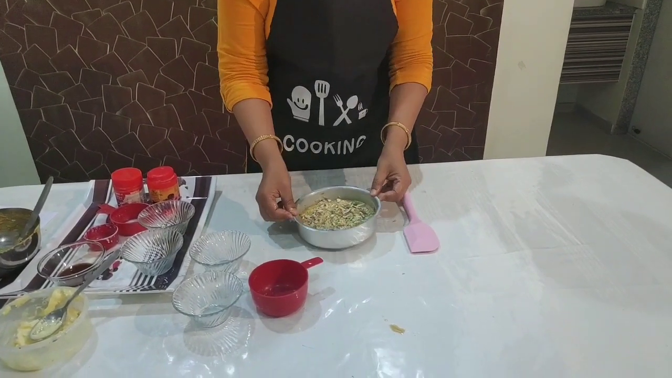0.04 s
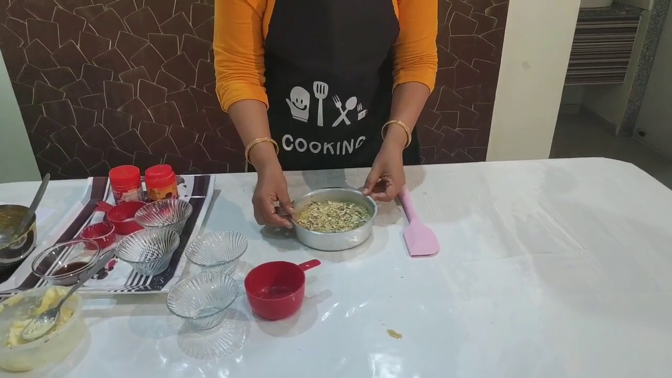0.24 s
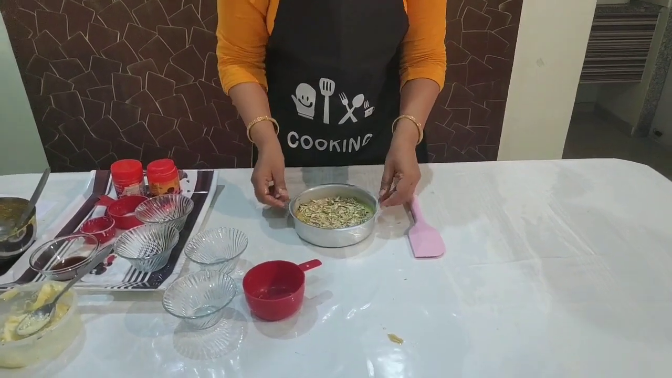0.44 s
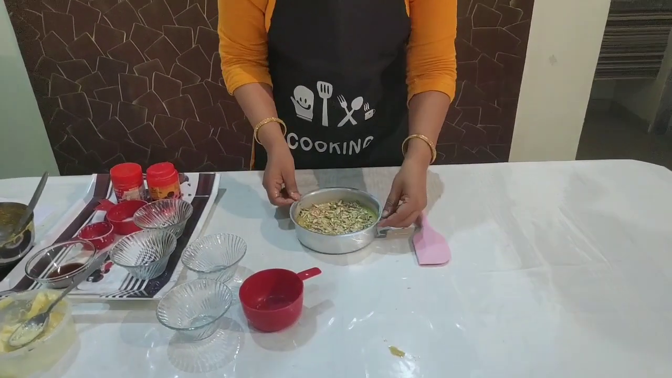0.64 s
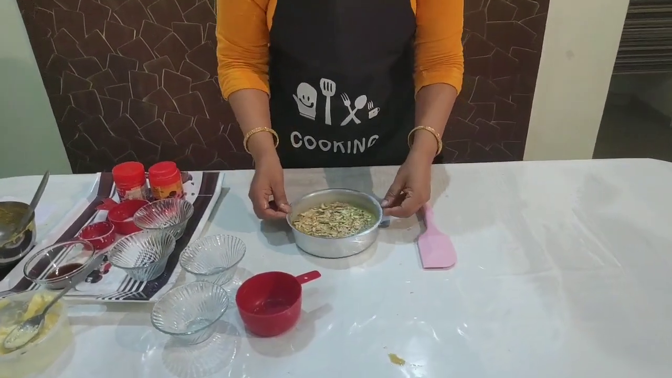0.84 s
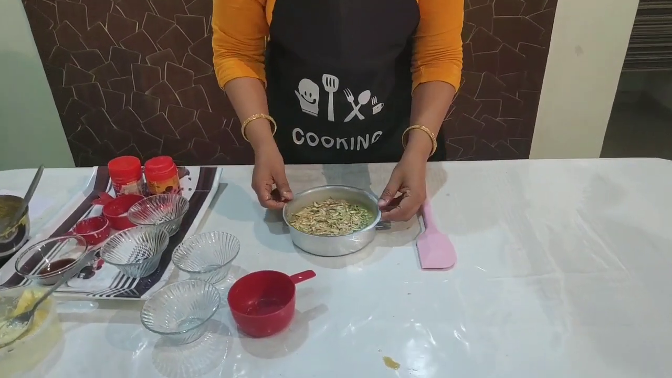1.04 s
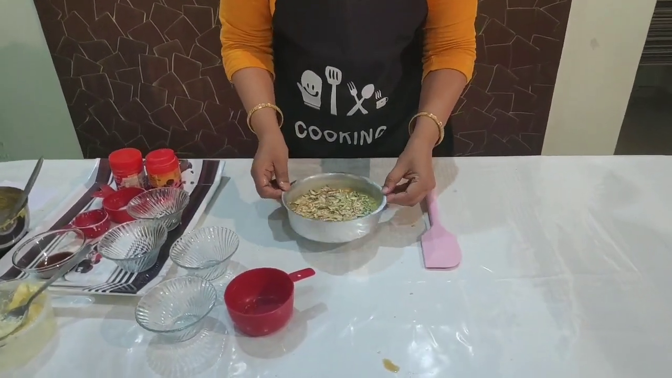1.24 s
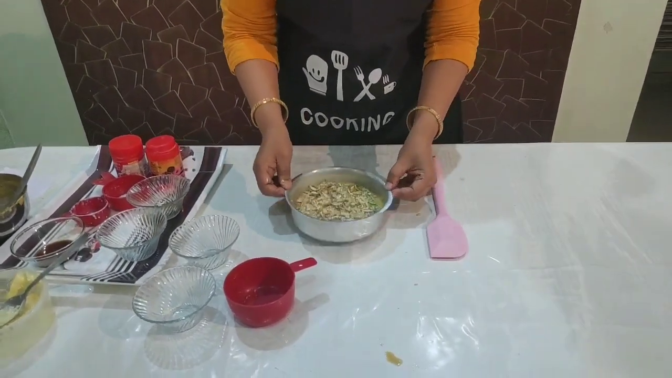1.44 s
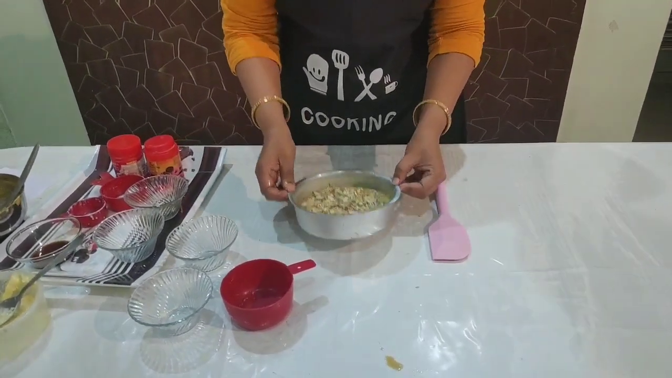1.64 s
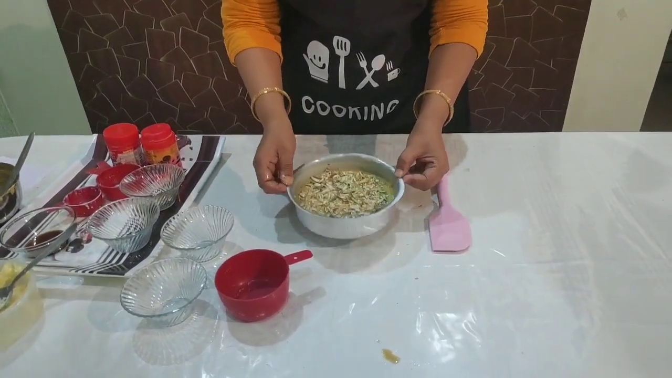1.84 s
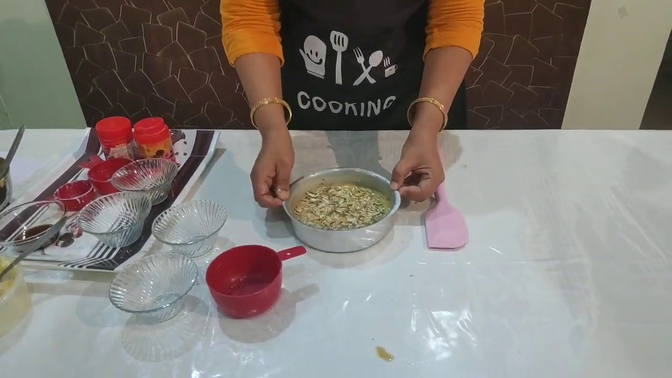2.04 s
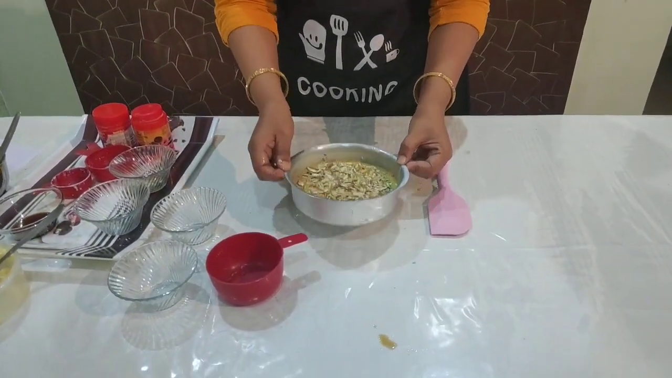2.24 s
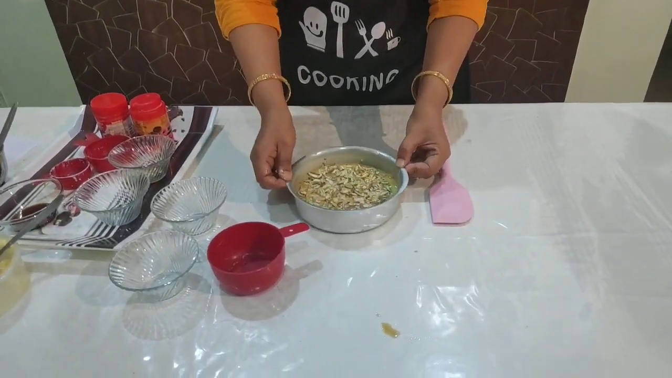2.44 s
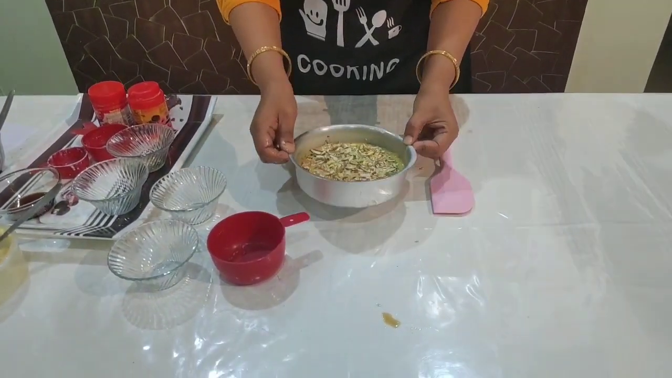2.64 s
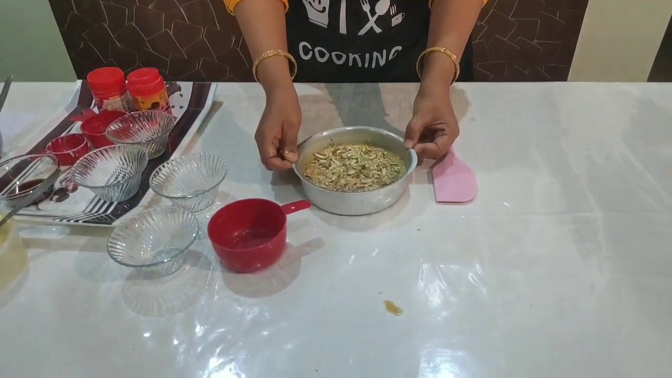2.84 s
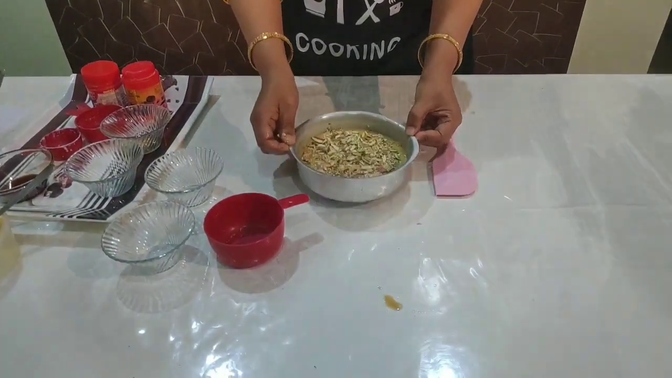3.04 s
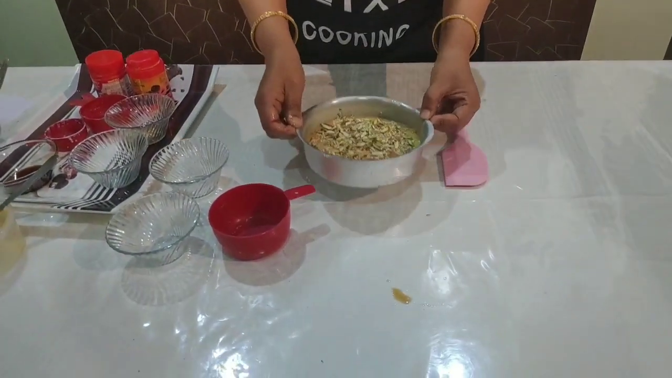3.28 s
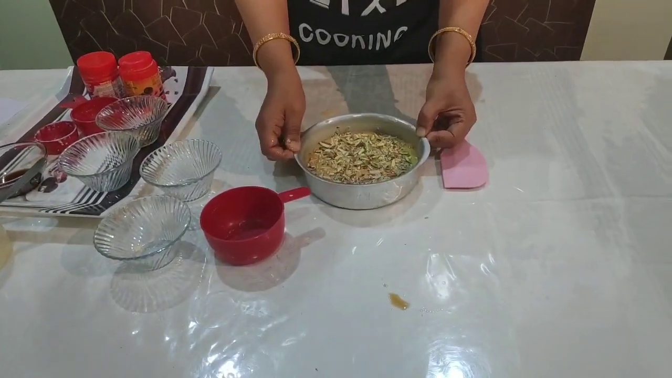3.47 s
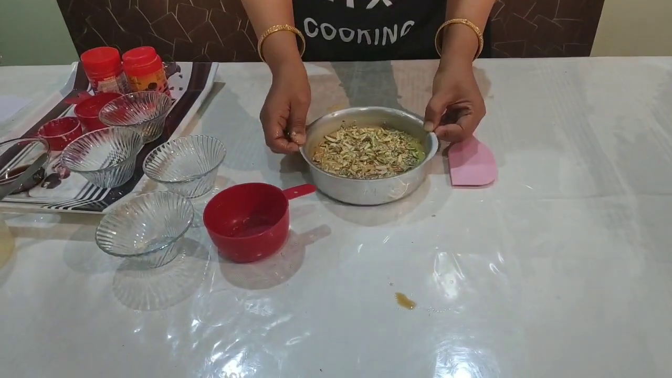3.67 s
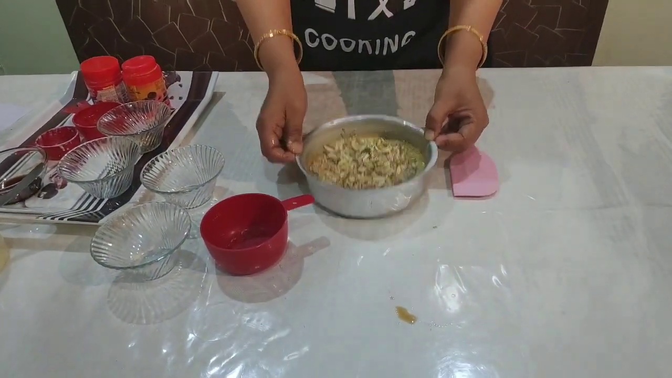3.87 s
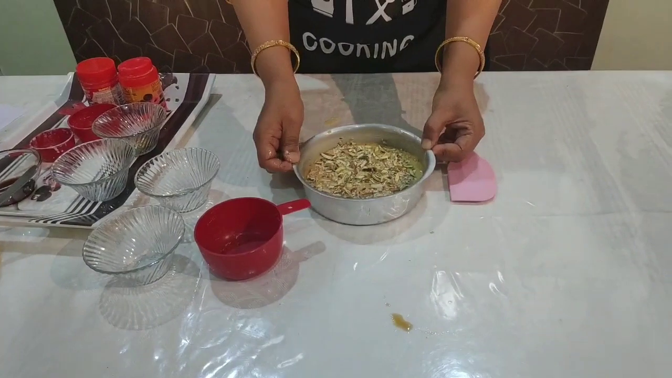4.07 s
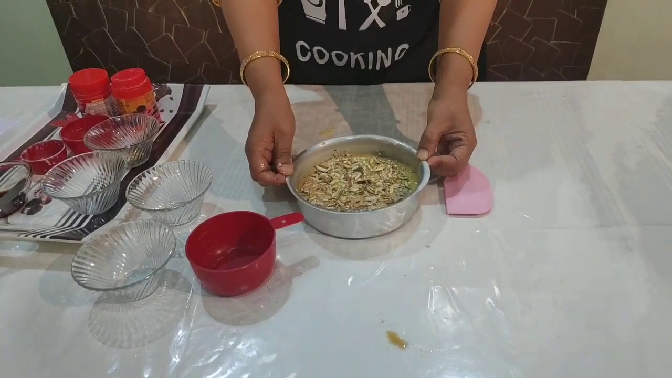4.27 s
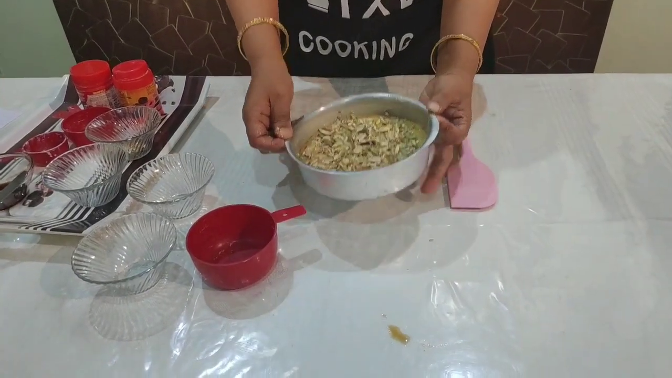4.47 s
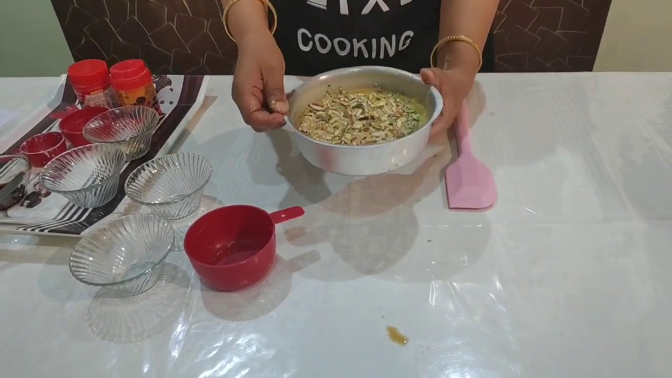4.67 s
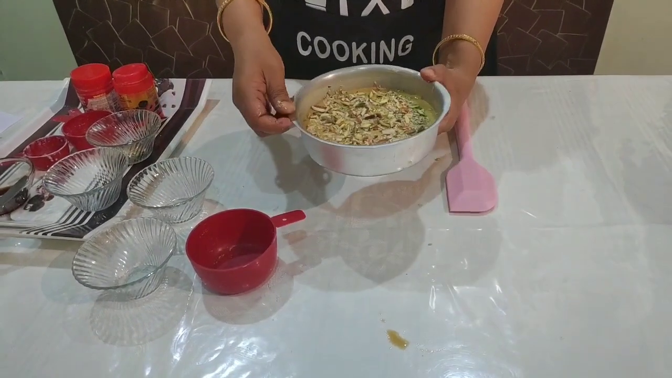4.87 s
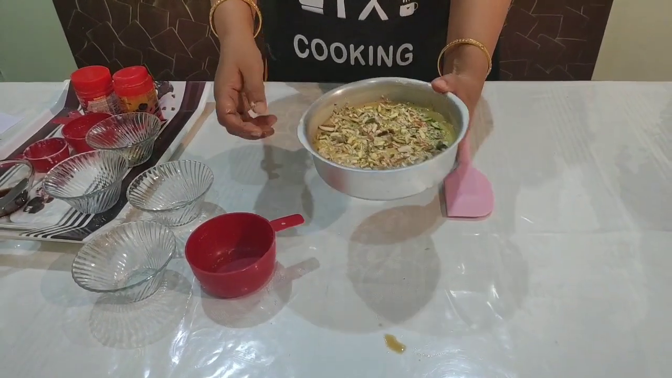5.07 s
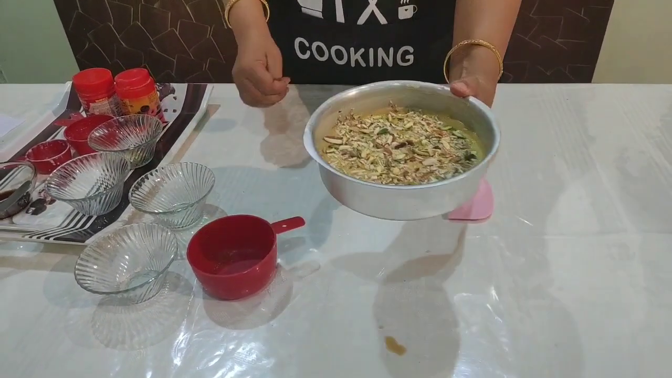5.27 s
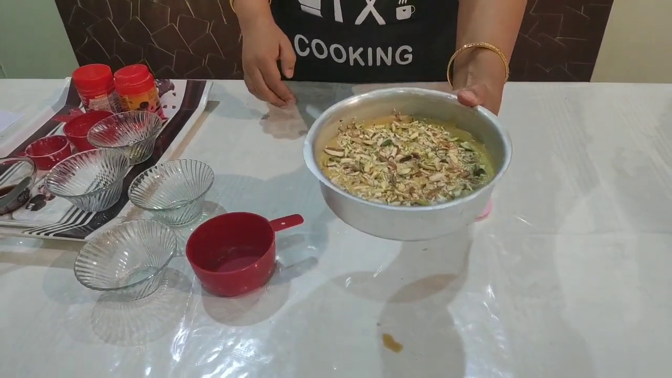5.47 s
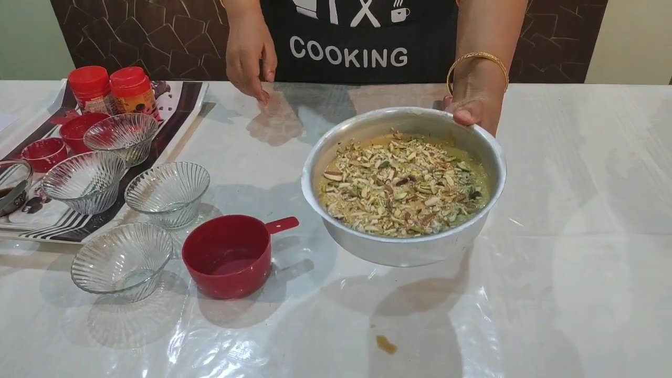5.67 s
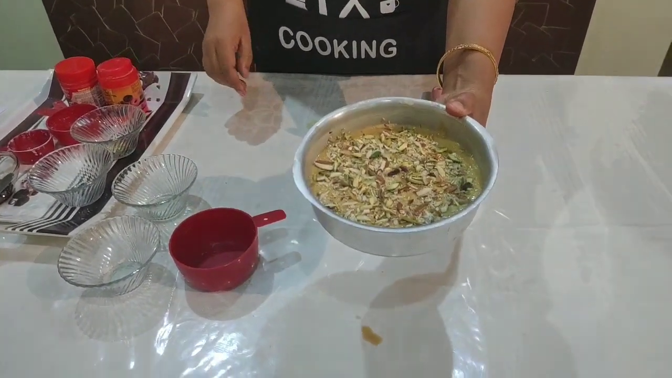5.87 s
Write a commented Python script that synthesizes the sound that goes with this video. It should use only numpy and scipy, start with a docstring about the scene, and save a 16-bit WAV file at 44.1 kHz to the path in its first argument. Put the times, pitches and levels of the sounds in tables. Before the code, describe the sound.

A hard-surfaced kitchen with quiet low room noise, a faint wavering hum near 150 Hz and lumpy handling rumble, strongest at the start. From 0.2 to 1.2 s sleeves swish softly with a few tiny ticks. A round metal tin full of batter then knocks on a table at about 1.4, 1.74, 2.08, 2.41, 2.82, 3.39 and 3.98 s. In the first six the rim strikes first with a very short, damped, mid-pitched clank, often followed within milliseconds by a lower base thud and a puff of squeezed air. The fifth and sixth are heaviest, near overload; the seventh is a dull, flat slap with little ring. Each leaves a low boom around 300 Hz and a bright room tail of roughly half a second. Small ticks follow at 4.35 to 4.6 s, then a clearer cloth swish around 5.3 s, and quiet room noise until 6 s. Stereo microphones, fairly close.

```python
"""A round tin full of batter is knocked seven times on a table in a hard-walled kitchen.
In the first six knocks the rim lands first with a short damped ring (fading sine waves struck by a
brief force); the seventh is a flat slap. Slaps squeeze out air (a puff of shaped noise and a slow push).
Table and room boom on (slowly dying low tones and noise tails), over room noise, a deep handling rumble,
a faint hum, small ticks (short snaps) and the swish of sleeves (noise that swells and fades)."""
import sys
import numpy as np
from scipy import signal
from scipy.fft import rfft
from scipy.io import wavfile
from scipy.ndimage import uniform_filter1d

SR = 44100
rng = np.random.default_rng(int(sys.argv[2]) if len(sys.argv) > 2 else 0)


def write(x):
    x = np.atleast_2d(x).T
    wavfile.write(sys.argv[1], SR, np.round(np.clip(x, -1, 1) * 32767).astype(np.int16))


N = 260631  # length of the scene in samples


def gain_of(db):
    """Turn decibels into a factor for the wave."""
    return 10 ** (np.asarray(db) / 20)


def evened(x):
    """Scale a sound to an average (rms) strength of 1."""
    return x / np.sqrt(np.mean(x ** 2) + 1e-20)


def read(points, hz):
    """Read a curve between its points, on a pitch-like (logarithmic) frequency scale."""
    f, value = np.transpose(points)
    return np.interp(np.log(hz + 1), np.log(f + 1), value)


def add(mix, s, sound):
    """Lay a sound into the mix, starting at s seconds."""
    part = mix[..., round(s * SR):][..., :sound.shape[-1]]
    part += sound[..., :part.shape[-1]]


def causal(db):
    """Make a filter that reacts as early as it can (minimum phase) from gains in dB on 1025 bins."""
    log_gain = np.log(gain_of(np.maximum(db, -100)))
    full = np.concatenate([log_gain, log_gain[-2:0:-1]])
    spectrum = np.exp(np.conj(signal.hilbert(full)))
    return np.fft.ifft(spectrum).real[:1024]


# How alike left and right are in sound that comes from all around.
# Each row: frequency in Hz, likeness from -1 (opposite) to 1 (identical).
LIKENESS = [(60, 0.81), (130, 1), (290, 0.86), (640, 0.59), (1410, -0.11), (3100, -0.037), (6820, 0.071),
            (15000, 0.62)]


def pair(shape):
    """Two channels of noise from all around; shape(hz, s) gives its level in dB at each pitch and time."""
    frames, hz = N // 256 + 5, np.fft.rfftfreq(1024, 1 / SR)
    a, b, c, d = rng.standard_normal((frames, 513, 4)).T
    same = np.clip(read(LIKENESS, hz), -1, 1)[:, None]
    left = a + 1j * b
    right = same * left + np.sqrt(1 - same ** 2) * (c + 1j * d)
    level = gain_of(shape(hz[:, None], np.arange(frames) * 256 / SR))
    return signal.istft(np.array([left, right]) * level, nperseg=1024, noverlap=768)[1][:, :N]


# Colour of the room noise. Each row: frequency in Hz, relative level in dB per Hz.
AIR_COLOUR = [(40, -7), (65, -32), (92, -30), (125, 2), (160, -2), (200, 1.5), (300, -3), (452, -5),
              (520, -8.5), (958, -10.5), (1330, -15.5), (3830, -23), (6720, -24.5), (11800, -35),
              (16400, -44)]
# How the deep handling rumble rises and falls. Each row: time in seconds, level in dB.
RUMBLE_LEVEL = [(0, -63), (0.08, -40.5), (0.3, -45), (0.42, -48), (1.2, -53.5), (1.35, -44), (1.6, -51),
                (4.4, -51), (5.3, -59), (5.9, -54)]
AIR_DB = -44
HUM_HZ, HUM_WIDTH_HZ, HUM_DB = 151, 5.9, -50.5


def air():
    """Steady noise fills the room, with a wavering hum and a lumpy deep handling rumble."""
    bed = pair(lambda hz, s: read(AIR_COLOUR, hz) + 0 * s)

    # slow random drift makes the hum waver; a wider hum drifts faster
    r = np.exp(-np.pi * HUM_WIDTH_HZ / SR)
    drift = evened(signal.lfilter([1 - r], [1, -r], rng.standard_normal((2, N))))
    waver = 5.1 + drift.T @ [1, 1j]
    hum = (waver * np.exp(2j * np.pi * HUM_HZ * np.arange(N) / SR)).real

    rumble = evened(pair(lambda hz, s: -12 * (hz / 55) ** 2 + 0 * s))
    level = gain_of(np.interp(np.arange(N) / SR, *np.transpose(RUMBLE_LEVEL)))
    # each side also gets a fainter time-reversed copy of itself, flipped on the right
    reversed_copy = 0.28 * rumble[:, ::-1] * [[1], [-1]]
    return gain_of(AIR_DB) * evened(bed) + gain_of(HUM_DB) * evened(hum) + level * (rumble + reversed_copy)


# Colour of the cloth hiss. Each row: frequency in Hz, relative level in dB per Hz.
CLOTH_COLOUR = [(1470, -5), (2500, -2), (3240, -2.5), (7010, 5.5), (12400, 2), (15600, -7), (16000, -9),
                (16400, -17)]
# Sleeves brush as the arms move. Each row: middle in seconds, length in seconds, peak level in dB.
SLEEVE_SWISHES = [(0.214, .12, -62), (0.41, 0.47, -54.5), (0.61, 0.36, -55), (0.908, 0.51, -57.5),
                  (1.12, .2, -62), (1.337, .08, -66), (1.687, 0.17, -54.5), (4.344, 0.3, -63.5),
                  (4.685, 1, -62), (5.324, 1, -48.5), (5.58, .2, -62)]
SWISH_POINTED = 3.9  # power of each arch: higher is more pointed
CLOTH_REST_DB = -66.5  # faint rustle under and between the swishes


def rustle():
    """Rubbing cloth makes a slightly grainy hiss that swells and fades with each movement of the arms."""
    grain = gain_of(0.83 * evened(uniform_filter1d(rng.standard_normal(N), 300)))
    t = np.arange(N) / SR
    level = gain_of(CLOTH_REST_DB)
    for middle, length, db in SLEEVE_SWISHES:
        arch = abs(np.cos(np.pi * np.clip((t - middle) / length, -.5, .5)))
        level = level + gain_of(db) * arch ** SWISH_POINTED
    hiss = pair(lambda hz, s: read(CLOTH_COLOUR, hz) + 0 * s)
    return level * evened(grain * hiss)


# Small ticks of fingers and bangles. Each row: start in seconds, relative level in dB, pitch in Hz.
SMALL_TICKS = [(0.181, -39.5, 3610), (0.2894, -45, 6860), (1.0807, -49, 2690), (4.353, -42.5, 3480),
               (4.4608, -42.5, 3160), (4.588, -49, 7560), (5.084, -51, 2640)]


def ticks():
    """Each tick is a brief broad snap around its pitch: a tone roughened by noise, dying quickly."""
    out, t = np.zeros((2, N)), np.arange(400) / SR
    noises = rng.standard_normal((len(SMALL_TICKS), 2, 400))
    for (s, db, hz), noise in zip(SMALL_TICKS, noises):
        snap = np.sin(2 * np.pi * hz * t) * uniform_filter1d(noise, 8) * 2 + 0.17 * noise
        add(out, s, gain_of(db - 60 * t / 0.097) * snap)  # would fall 60 dB in 0.097 s
    return out


# Air squeezed from under the tin. Each row: start in seconds, puff level in dB (rms before it is shaped
# in time), puff length in ms, relative push level in dB, length of one push cycle in ms,
# mid-treble boost of the puff in dB.
AIR_SLAPS = [(1.394, -34, 6.2, -29, 7.6, 2), (1.4225, -23, 6.4, -19, 10.5, -4),
             (1.74, -20.5, 1.5, -41, 4.4, -4), (1.7472, -16, 5.5, -12, 8.8, 6),
             (2.0795, -21.5, 3.9, -20, 11.4, 14), (2.0879, -26.5, 7.1, -16, 8.5, -7),
             (2.4041, -29.5, 2.42, -18.5, 9.7, 1), (2.4097, -22.5, 6, -12.5, 9.2, -4.5),
             (2.8161, -15.5, 7.2, -13.5, 9.9, 0), (3.393, -14.5, 9.1, -12.5, 9.9, -0.5),
             (3.9842, -20, 7.8, -10.5, 9.6, 1.5)]
# Colour of the puff. Each row: frequency in Hz, relative level in dB per Hz.
PUFF_COLOUR = [(900, -21), (1700, -3.5), (2750, -8), (3350, -4.5), (3600, -4), (4000, -8), (4700, -7.5),
               (5500, -9), (6600, -1.5), (8140, -8), (11400, -10), (15300, -19.5), (16400, -35)]
LEAD_MS = 3  # a faint hiss leads in before each puff


def slaps():
    """The closing gap hisses out a puff, also sent to the walls, and pumps air in a slow fading cycle."""
    puffs, spread, pushes = np.zeros((2, N)), np.zeros(N), np.zeros(N)
    hz = np.fft.rfftfreq(2048, 1 / SR)
    noises = rng.standard_normal((len(AIR_SLAPS), 3, 1000))
    for (s, db, ms, push_db, push_ms, tilt_db), noise in zip(AIR_SLAPS, noises):
        boost = tilt_db * np.exp(-np.log(hz / 3500 + 1e-3) ** 2)
        colour = causal(read(PUFF_COLOUR, hz) + boost)
        shared_and_own = 1.04 * noise[0] + 0.48 * noise[1:]  # partly alike on left and right
        hiss = signal.oaconvolve(shared_and_own, colour[None])[:, :1000]

        u = (np.arange(1000) / SR * 1000 - LEAD_MS) / max(ms, 1)  # 0 to 1 during the puff
        swell = np.sin(np.pi * np.clip(u, 0, 1) ** 0.81) ** 1.76
        lead_in = 0.079 * (u < .5) * np.exp(5.3 * np.minimum(u, 0))
        puff = gain_of(db) * evened(hiss) * (swell + lead_in)
        add(puffs, s - LEAD_MS / 1000, puff)

        # the walls get the puff's energy as one coloured click at its middle
        add(spread, s + ms / 2000, colour * np.linalg.norm(puff[0]) / np.linalg.norm(colour))

        v = np.arange(1500) / SR * 1000 / max(push_ms, 2)  # counts push cycles
        push = np.sin(2 * np.pi * v) * v * np.exp(1 - 2.23 * v) * 2
        add(pushes, s, -gain_of(push_db) * push)
    return puffs, spread, pushes


# Tones (modes) of the tin, damped by batter, before each blow's pitch factor.
# Each row: frequency in Hz, relative level in dB, time to fall 60 dB in seconds.
TIN_MODES = [(432, -26.5, 0.11), (661, -1, 0.031), (800, 2, 0.015), (909, -0.5, 0.016), (1136, -4.5, 0.022),
             (1392, -2, 0.024), (1666, -19, 0.045), (1922, -11.5, 0.028), (2270, -24, 0.027),
             (2550, -24.5, 0.0093)]
# The rim strikes the table first in six knocks. Each row: start in seconds, peak level in dB,
# pitch factor of the loaded tin, brightness in dB per octave.
RIM_BLOWS = [(1.3985, -8, 1.086, 3), (1.741, -4.5, 1.07, 4), (2.0822, -7, 0.962, 1.5),
             (2.4066, -2.5, 1.01, 6.5), (2.8170, -3, 1.043, 25), (3.3958, -5.5, 1.09, 10)]
# The base lands lower in pitch, sometimes softer and sometimes louder, swinging the other way.
# Each row: start in seconds, peak level in dB, pitch factor, brightness in dB per octave,
# contact time in ms (about half the full length of the force).
BASE_BLOWS = [(1.4088, -21, 0.56, -2, 0.24), (1.428, -19.5, 0.7, -4, 1.35), (1.7507, -10, 0.88, 1, 0.48),
              (2.8218, 1.25, 0.61, 4.5, 0.36), (3.3995, -0.9, 0.74, -2, 0.77),
              (3.9903, -13, 0.41, -14, 0.35)]
RIM_CONTACT_MS = 0.27  # also about half the full length of the force
RADIATES_ABOVE_HZ = 300  # a small tin couples poorly to the air in the bass


def rim():
    """Short smooth forces on rim and base ring the damped tin; the walls get its energy, modes blurred."""
    out, spread, t = np.zeros(N), np.zeros(N), np.arange(2048) / SR
    hz, mode_db, t60 = np.transpose(TIN_MODES)[:, :, None]
    bass_cut = signal.butter(2, RADIATES_ABOVE_HZ, "high", fs=SR)
    blows = [(*row, RIM_CONTACT_MS, -1) for row in RIM_BLOWS] + [(*row, 1) for row in BASE_BLOWS]
    for s, db, pitch, bright_db, ms, swing in blows:
        force = swing * np.hanning(int(max(ms, .05) * SR / 500) + 3)
        fading = gain_of(mode_db + bright_db * np.log2(hz / 640) - 60 * t / t60)
        modes = fading * np.sin(2 * np.pi * hz * pitch * t)
        blow = signal.lfilter(*bass_cut, np.convolve(modes.sum(0), force)[:2048])
        blow *= gain_of(db) / abs(blow).max()
        add(out, s, blow)
        power = uniform_filter1d(abs(rfft(blow)) ** 2, size=19)  # blur neighbouring frequencies
        add(spread, s, swing * causal(10 * np.log10(power + 1e-12)))
    return out, spread


# First reflections. Each row: delay in ms (a tiny random extra is added on each side), level in dB.
FIRST_ECHOES = [(1.6, -11.5), (3.3, -40), (4.8, -31), (9.3, -16.5), (11.2, -23), (13.5, -22), (19, -28),
                (35, -18)]


def echoes(x):
    """Table and walls send back a few first reflections, each a delayed quieter copy."""
    taps = np.zeros((2, 2400))
    for ms, db in FIRST_ECHOES:
        delay = int(ms * SR / 1000) + rng.integers(0, 12, 2)
        taps[[0, 1], delay] += gain_of(db)
    return signal.oaconvolve(x, taps, axes=1)[:, :N]


# How long the kitchen rings. Each row: frequency in Hz, time to fall 60 dB in seconds.
KITCHEN_DECAY = [(60, 0.28), (160, 0.66), (420, 0.58), (1100, 0.7), (2910, 0.62), (7680, 0.53)]
# Colour of the kitchen's tail. Each row: frequency in Hz, relative level in dB.
KITCHEN_COLOUR = [(60, -31), (200, 4), (500, -5), (1000, -0.5), (2000, -2), (4000, -6), (8000, -5.5),
                  (15000, -3.5)]


def kitchen(x):
    """Each band dies at its own speed; three noise tails blend in turn, so the knocks' tails vary."""
    out, turn = np.zeros((2, N)), np.arange(N) / SR * np.pi / 1.05
    for k in range(3):
        tail = pair(lambda hz, s: read(KITCHEN_COLOUR, hz) - 60 * s / read(KITCHEN_DECAY, hz))[:, :SR]
        tail *= np.clip(np.arange(SR) / SR / 0.0018, 0, 1)  # fades in over 1.8 ms
        share = np.sqrt(2 / 3) * np.cos(turn + k * np.pi / 3)
        out += signal.fftconvolve((x * share)[None], tail / np.linalg.norm(tail[0]), axes=1)[:, :N]
    return gain_of(-2.5) * out


# Low tones (modes) of table and room. Each row: frequency in Hz, relative level in dB,
# time to fall 60 dB in seconds, build-up time in seconds.
BOOM_MODES = [(36.5, -15, 0.74, 0.0067), (85, -21.5, 0.28, 0.023), (121.6, -24, 0.95, 0.0057),
              (174.5, -24.5, 0.26, 0.016), (217, -12, 0.29, 0.005), (280.6, -4, 0.63, 0.0045),
              (297.9, 4, 0.3, 0.011), (374.7, -18.5, 0.66, 0.0061), (451, -15.5, 0.67, 0.038),
              (465.7, -12.5, 0.72, 0.0023)]


def boom(x):
    """Low modes of table and room swell for a moment and die slowly."""
    t = np.arange(SR) / SR
    modes = np.zeros(SR)
    for hz, db, t60, rise in BOOM_MODES:
        build_up = 1 - np.exp(-t / max(rise, .001))
        modes += gain_of(db - 60 * t / t60) * build_up * np.sin(2 * np.pi * hz * t)
    return gain_of(-36) * signal.fftconvolve(x, modes)[:N]


def scene():
    """Add the direct sounds, what table and room make of them, and the background."""
    ring, walls = rim()
    puffs, spread, pushes = slaps()
    ring_pair = ring * gain_of([[-1.1], [1.1]])  # a little louder on the right
    direct = ring_pair + puffs + pushes + ticks()
    room = echoes(direct) + kitchen(walls + spread + pushes) + boom(pushes + 0.37 * walls)
    return direct + room + air() + rustle()


# The two microphone ports resonate differently. Each row: frequency in Hz, left minus right in dB.
PORT_DIFFERENCE = [(60, 0.1), (700, -0.45), (2400, 0.1), (4970, -0.9), (6500, -3.5), (7600, -4),
                   (9000, 3.5), (10400, 11.5), (15000, 16)]
EDGE_HZ = 16300  # nothing much passes above this


def record(dry):
    """The ports colour each side, the bass rolls off, overload clips at full scale and the top is cut."""
    half_db = read(PORT_DIFFERENCE, np.fft.rfftfreq(2048, 1 / SR)) / 2
    ports = np.array([causal(half_db), causal(-half_db)])
    coloured = signal.oaconvolve(dry, ports, axes=1)[:, :N]
    coloured = signal.lfilter(*signal.butter(2, 28., "high", fs=SR), coloured)
    clipped = np.clip(coloured, -1, 1)
    top_cut = signal.firwin(511, EDGE_HZ, window=("kaiser", 9), fs=SR)
    return signal.oaconvolve(clipped, top_cut[None], "same", axes=1)


dry = scene()
out = record(dry)
write(out)
```